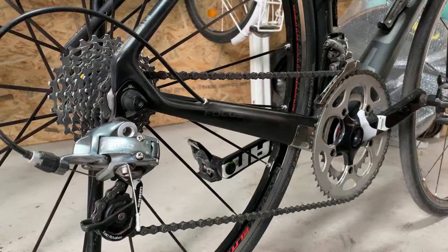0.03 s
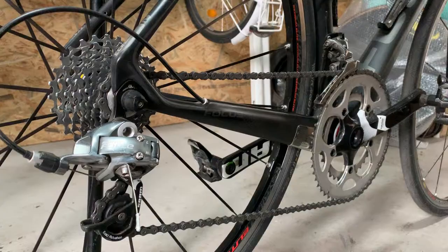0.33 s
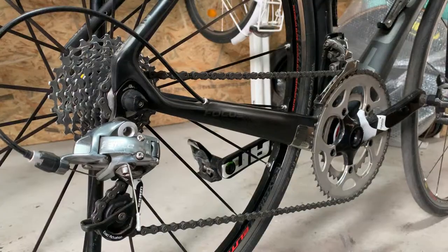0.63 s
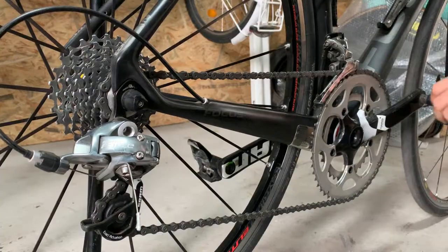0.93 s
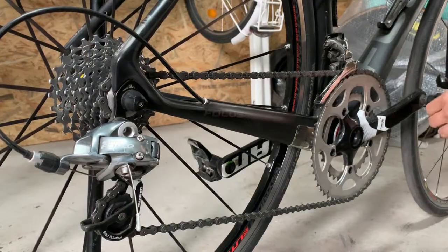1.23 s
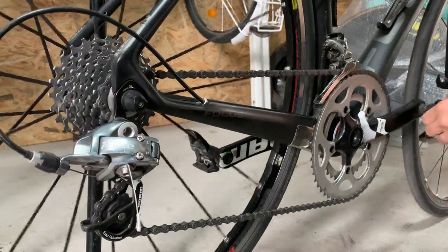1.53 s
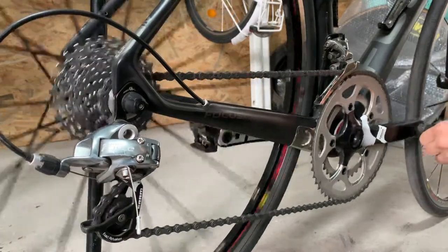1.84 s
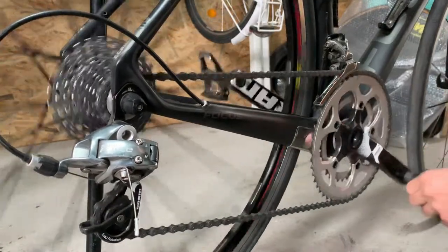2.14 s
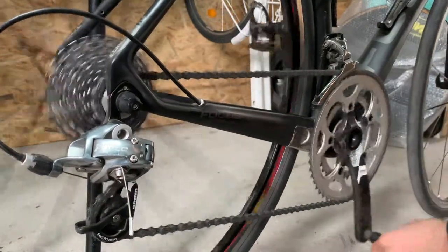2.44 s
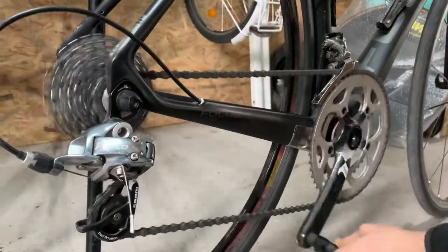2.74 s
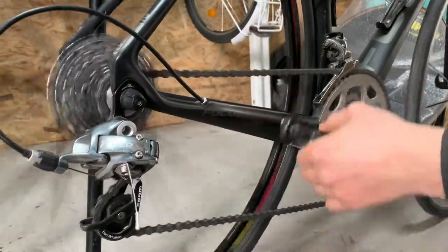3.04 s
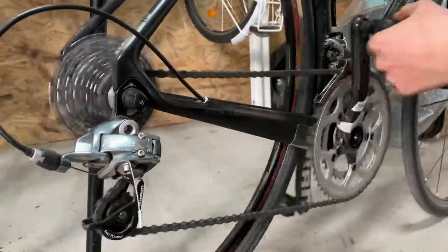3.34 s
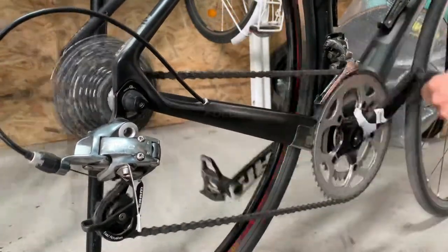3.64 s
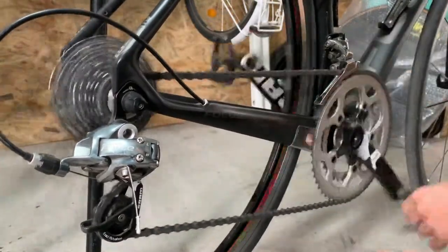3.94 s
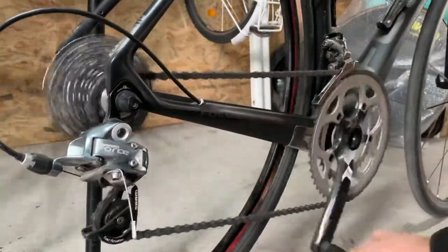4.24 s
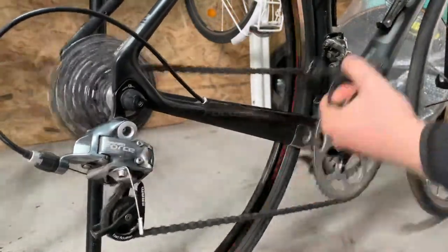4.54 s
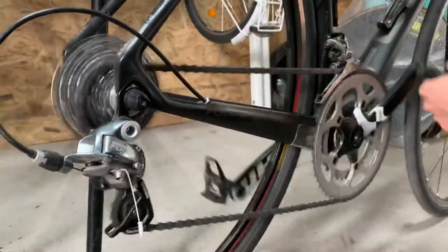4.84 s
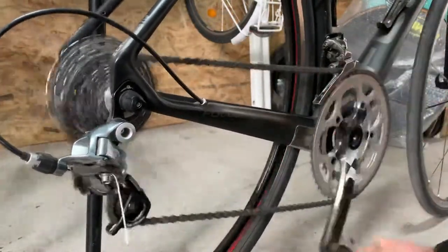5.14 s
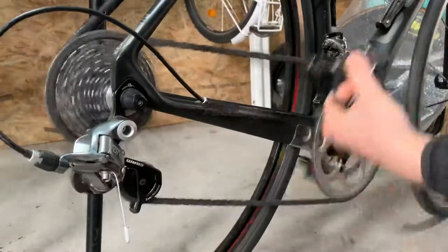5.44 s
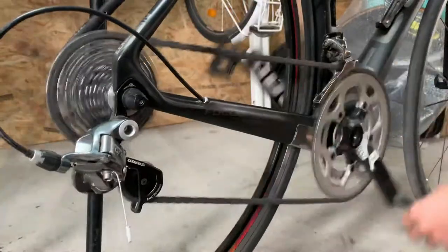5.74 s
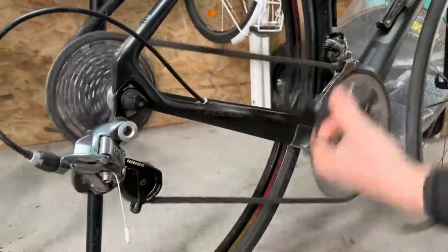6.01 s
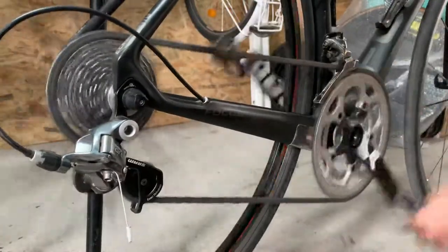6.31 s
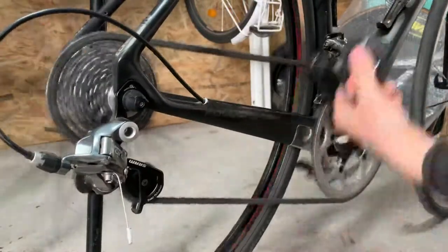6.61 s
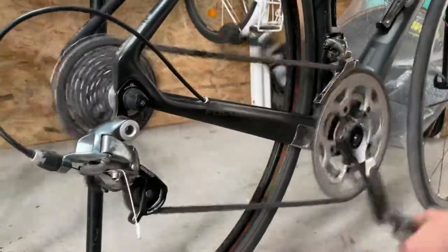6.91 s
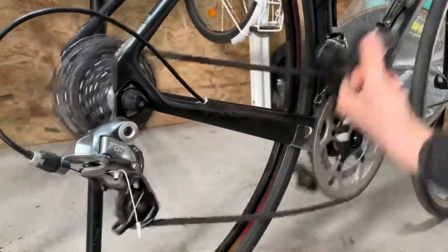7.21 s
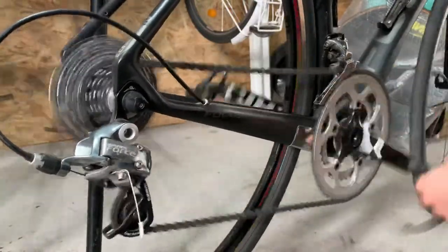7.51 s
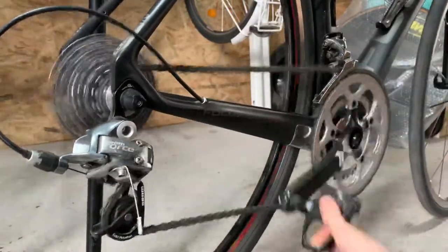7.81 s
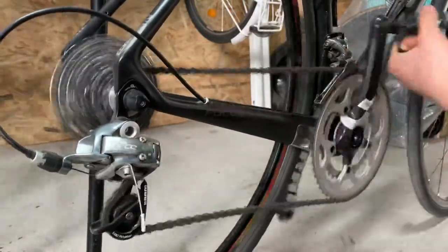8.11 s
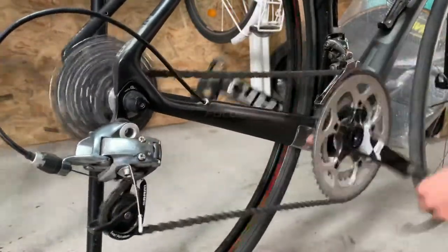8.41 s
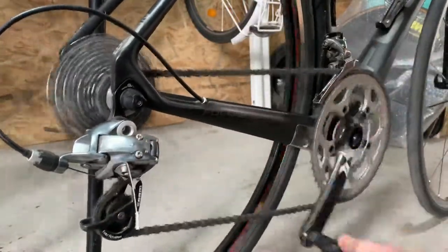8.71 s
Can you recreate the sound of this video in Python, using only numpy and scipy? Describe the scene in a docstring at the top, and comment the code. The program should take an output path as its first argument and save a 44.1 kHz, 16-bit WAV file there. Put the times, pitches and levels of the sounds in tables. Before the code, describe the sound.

Heard close up in stereo, a bicycle on a repair stand is cranked by hand. Soft cloth rustle and dull knocks give way to the quickening tick of chain links. Two flurries of gear changes follow, with a bright, clicking whirr between them: the chain scrapes across sprockets, lands with metallic clacks that ring the frame, and rattles as it settles. The small workshop adds short reflections and a faint low rumble.

```python
"""A sleeve brushes and a few dull knocks sound as a hand takes up the crank of a bicycle on a repair stand.
The chain gathers speed, each link ticking onto a tooth. The derailleur drags it up the cassette and back
down: it scrapes across the sprockets, drops onto each with a clack that rings cage, frame and wheel, and
rattles as it settles. We listen close up through a two-port microphone, in a small, live workshop."""
import sys
import numpy as np
from scipy import signal
from scipy.fft import rfft, irfft, next_fast_len
from scipy.io import wavfile

SR = 44100
rng = np.random.default_rng(int(sys.argv[2]) if len(sys.argv) > 2 else 0)


def generate_wav(signal):
    """Clip the signal to [-1, 1] and save it as 16-bit WAV at the path in sys.argv[1]."""
    frames = np.transpose(np.atleast_2d(signal))
    scaled = np.clip(frames, -1, 1) * 32767
    pcm = np.round(scaled).astype(np.int16)
    wavfile.write(sys.argv[1], SR, pcm)


N = 386316
T = np.arange(N) / SR
SIZE = next_fast_len(N + SR)
HZ = np.maximum(np.arange(SIZE // 2 + 1) * SR / SIZE, 1)

# chain speed: t/s, link rate/Hz
LINK_RATE = [(2.2, 41.18), (2.29, 41.74), (2.58, 51.1), (3.13, 60.83), (4.12, 74.06), (4.92, 71.1),
             (5.41, 72.1), (5.8, 94.6), (6.02, 83.33), (6.36, 98.06), (6.6, 86.36), (6.93, 95.4),
             (8.06, 78.4), (8.76, 78.5)]
# up the cassette and back: t/s, sprocket size (0 smallest, 1 largest)
SPROCKET_SIZE = [(4.12, 0.44), (4.75, 0.76), (5.3, 0.97), (5.6, 1), (6.2, 1), (6.6, 1), (7.25, 0.84),
                 (8.0, 0.59), (8.6, 0.27)]
# the chain drops onto a sprocket: t/s, snap/dB, thud/dB, cage ring/dB, cage f/Hz,
# sprocket clank/dB, clank f/Hz, cassette ping/dB, rattle/dB, contact/s
DROPS = [(4.1757, -26, -60, -58, 880, -40.5, 1374, -56, -35, 0.00067),
         (4.207, -29, -45, -42, 700, -57, 1210, -35, -43, 0.0023),
         (4.2695, -33, -36.5, -46, 853, -53, 1380, -37.5, -58, 0.002),
         (4.326, -23.5, -38.5, -33.5, 737, -32, 1170, -51, -61, .0011),
         (4.407, -46, -41.5, -33.5, 850, -38, 1700, -41, -43, 0.0012),
         (4.5002, -26.5, -36.5, -50, 600, -34, 1770, -38.5, -62, 0.0008),
         (4.508, -50, -37.5, -29, 662, -30.5, 1244, -54, -59, 0.0015),
         (4.662, -27.5, -41, -36.5, 760, -29, 1360, -36, -33, 0.0018),
         (4.711, -26.5, -52, -52, 803.5, -49, 1406, -52, -36, 0.00093),
         (4.831, -24, -35, -43, 643, -47, 1085, -53, -51, 0.0012),
         (4.8743, -20.5, -35, -29.5, 763, -32.5, 1140, -46, -56, 0.00077),
         (5.024, -20, -30, -30, 945, -30, 1378, -49, -30, 0.0038),
         (5.0841, -31, -53, -26.5, 845.5, -31, 1650, -45, -47, 0.00077),
         (5.1237, -24.5, -33.5, -39, 780, -39, 1379, -44, -31, .0057),
         (5.1862, -17, -36, -35, 875, -32, 1750, -37, -51, 0.00078),
         (5.3471, -16, -27.5, -27.5, 875, -24.5, 1430, -20.5, -69, 0.00097),
         (5.39, -30, -42, -29, 871, -45, 1430, -48, -35.5, 0.00084),
         (6.6372, -22, -35, -49, 1047, -35.5, 1226, -34, -34, 0.0015),
         (6.78, -22.5, -35, -49, 849, -30.5, 1360, -27, -27.5, 0.0027),
         (6.8264, -20.5, -43, -31, 842, -41, 1600, -34, -45, 0.0011),
         (6.8627, -24.5, -33, -30, 982, -25.5, 1350, -44, -27, 0.0024),
         (6.9697, -16.5, -32, -36, 907, -21.5, 1777, -45, -27.5, 0.0018),
         (7.07, -25, -33.5, -46, 1030, -48, 1220, -36, -31.5, 0.0019),
         (7.116, -15, -49, -48, 807, -25, 1790, -45, -45, 0.0012),
         (7.129, -36, -27, -26, 890, -32, 1376, -47, -35, .0014),
         (7.1922, -22.5, -38, -38, 826, -48, 1197, -34, -31.5, 0.0015),
         (7.2666, -18, -32, -24.5, 854, -23.5, 1598, -27, -36, .0012),
         (7.3422, -17.5, -38, -35, 818, -25.5, 1540, -33, -30.5, 0.00274),
         (7.3615, -18, -28.5, -49, 743, -42, 1422, -41, -44, 0.00085),
         (7.3975, -25, -31, -33, 1010, -38, 1210, -40, -34, 0.0015),
         (7.43, -27, -32, -31, 872, -26, 1978, -34, -49, 0.0027),
         (7.465, -25, -39, -52, 870, -33, 1200, -47, -55, .003),
         (7.5863, -38, -31.5, -21.5, 900, -21, 1122, -26.5, -29.5, 0.0025),
         (7.7241, -17.5, -29.5, -50, 840, -34, 1420, -36, -26, 0.0019),
         (7.7535, -20.5, -27.5, -35.5, 868, -26, 1625, -48, -35, 0.0012),
         (7.911, -26, -26, -32, 862, -31, 1320, -47, -31, 0.0018),
         (7.982, -28, -44, -32, 858, -30.5, 1185, -36, -32.5, 0.0025),
         (8.1294, -22.5, -29.5, -21, 872, -22.5, 1259, -43, -30, 0.0025),
         (8.3713, -19, -28.5, -16, 875.6, -17, 1360, -28, -31, 0.0019),
         (8.4719, -18, -31.5, -53, 908, -26.5, 1960, -39, -33.5, 0.0012),
         (8.6009, -23.5, -25, -17, 844, -19, 1740, -20, -39.5, 0.00079)]
# single links that seat hard: t/s, level/dB
HARD_LINKS = [(1.883, -76), (1.929, -60), (2.016, -53), (2.06, -58), (2.095, -51), (2.493, -47),
              (2.574, -49), (2.766, -44), (4.746, -20.5), (4.774, -24), (4.789, -28.5), (4.857, -30),
              (5.26, -32), (5.29, -46), (5.317, -50), (5.516, -33), (5.583, -49), (5.595, -26),
              (5.616, -25.5), (5.856, -28), (5.944, -29), (5.993, -27.5), (6.1139, -21.5), (6.18, -27.5),
              (6.344, -26.5), (6.4047, -24.5), (6.94, -24), (6.9562, -23.5), (6.994, -21), (7.141, -25),
              (7.354, -17), (7.41, -21), (7.58, -20.5), (7.7375, -17), (7.8473, -26), (7.8976, -16),
              (8.183, -24), (8.577, -17.5)]
# each jerk booms in a different part of frame, wheel or stand: t/s, level/dB, f/Hz
JERKS = [(1.44, -40, 315), (1.735, -44.5, 157.5), (2.114, -38, 72), (2.12, -45, 166), (2.23, -51, 160),
         (2.39, -49, 188), (3.47, -40, 113), (3.52, -45, 221), (3.57, -42.5, 361), (4.51, -37, 309),
         (4.755, -36.5, 172), (4.81, -34, 167), (4.88, -33, 186), (5.026, -36, 534), (5.352, -35, 306),
         (5.356, -29, 178), (7.129, -35, 464), (7.27, -30, 303), (7.587, -37, 658), (7.59, -31, 298),
         (7.735, -40, 154.9), (7.754, -38, 614), (7.912, -42, 282), (8.381, -28, 315),
         (8.478, -29.5, 163.7), (8.488, -31, 296), (8.59, -30, 183), (8.607, -30, 563), (8.625, -35, 78)]
# crank and freewheel: t/s, thud/dB, cage ring/dB, cage f/Hz, clank/dB, clank f/Hz, contact/s
CRANK_KNOCKS = [(0.368, -64, -58.5, 457, -82, 800, 0.0015), (1.110, -84, -72, 805, -63, 1110, 0.0022),
                (1.4335, -37.5, -36, 899, -35.5, 1110, 0.00074), (1.4425, -49, -46, 820, -41, 1030, .001),
                (1.4515, -46, -43, 940, -56, 1290, 0.00084), (1.7295, -42, -43, 824, -47, 1300, 0.00091),
                (2.114, -40.5, -41.5, 810, -40.5, 1280, 0.00097), (2.4, -69, -75, 800, -70, 1200, 0.0012),
                (3.118, -54, -53, 780, -66, 750, 0.0087), (3.145, -55, -53, 778, -62, 740, .01),
                (3.486, -48, -56, 700, -63, 780, 0.0078), (3.513, -41, -45, 750, -53, 720, 0.009),
                (3.543, -46, -43, 733, -53, 720, .01), (4.025, -43, -47, 800, -45.5, 1420, 0.0021),
                (4.066, -51, -52, 820, -62, 1100, 0.002)]
# the arm reaches for the pedal: peak t/s, half length/s, level/dB
SLEEVE_SWELLS = [(0.724, 0.21, -61.5), (1.13, 0.13, -61.5)]

# bodies with a set pitch: f/Hz, width/Hz, relative level/dB
FRAME_MODES = [(184, 42, 7), (302.8, 9.5, 16), (521, 240, 0.5), (541, 5.1, 7.5), (745.6, 8.9, 4),
               (812, 15, 8), (892, 20, -1), (990, 116, -19)]  # frame and wheel
CASSETTE_MODES = [(4280, 850, 5), (4740, 430, 13.5), (5730, 1200, 5)]
LARGE_SPROCKET_MODES = [(1750, 84, -3), (4830, 530, -2)]
# parts pitched anew by each strike: multiple of the pitch, width/Hz, relative level/dB
CAGE_MODES = [(.86, 110, -12), (0.921, 16.5, -4), (1.001, 95, 9)]  # derailleur cage
SPROCKET_MODES = [(.8, 220, -10.5), (1, 170, 3.5), (1.23, 220, 2.5), (1.5, 336, 0), (2.698, 500, -6.5)]
ROLLER_MODES = [(.65, 454, -6), (1, 330, 2), (1.63, 300, -5), (2.45, 350, 2), (3.1, 353.2, 6)]
BOOM_MODES = [(1, 16, -2), (1.23, 43, -10)]
# tone colour of each layer: f/Hz, relative level/dB
TICK_EQ = [(150, -45), (1200, -9), (2800, -10), (3900, -6), (4600, -25), (5500, 1), (6500, 6.5),
           (7500, -6.5), (10000, 4), (12500, 3.5), (15500, 5)]
ZING_EQ = [(2000, -45), (6500, -5.5), (7400, 4.5), (8400, 4.5), (9600, -4.5), (12500, -4), (15500, -11)]
SCRAPE_EQ = [(300, -18), (900, -3), (1700, -0.5), (2700, -2.5), (4500, -1.5), (6000, -9.5), (7800, 0),
             (11000, 3), (16000, -14)]
RUMBLE_EQ = [(20, -1), (45, -7), (85, 5.5), (120, 2), (170, 4), (240, -6.5), (400, -2.5), (800, -3.5),
             (1400, -10.5), (2500, -19.5), (6000, -48)]
SNAP_EQ = [(500, -10.5), (1500, -6), (3000, -10), (4700, 0), (6200, 2), (7800, 5.5), (10000, 1.5),
           (12500, 6.5), (15500, 4)]
THUD_EQ = [(60, -39), (150, 0), (400, -3.5), (560, -2.5), (900, 4.5), (1600, -3.5), (2600, -1.5),
           (5000, -15), (9000, -33), (16000, -56)]
KNOCK_EQ = [(60, -8), (150, -7.5), (400, 3), (780, 1), (1100, -4), (1600, -10), (2100, -14.5), (4500, -18),
            (6000, -33), (7600, -31), (16000, -36)]
CLOTH_EQ = [(200, 0), (550, 1), (900, 3), (1500, 2), (2600, -2), (4200, -6.5), (6000, -8), (8000, -10),
            (15000, -8.5)]
ROOM_TONE_EQ = [(18, -30), (25, -29), (34, 3), (48, -2), (100, -11), (160, -21.5), (255, -25.5), (640, -31),
                (1300, -34), (2500, -36.5), (4000, -38.5), (8000, -47.5), (11000, -56.5), (16000, -45)]
# workshop decay: f/Hz, T60/s
REVERB_T60 = [(150, 0.63), (400, 0.75), (800, 0.57), (1400, 0.65), (2800, 0.4), (4500, 0.78), (8000, 0.28),
              (15000, 1.6)]
# workshop reverb strength: f/Hz, level/dB
REVERB_EQ = [(100, -7.5), (300, 3), (800, -0.5), (2000, 0.5), (4500, 1.5), (8000, -7), (15000, -10.5)]
# tension pulses: multiple of the link rate, relative level/dB
HUM_PARTIALS = [(.5, -11), (1, 1), (2, -1)]
# the image leans left: f/Hz, left over right/dB
LEAN = [(150, 1.0), (350, 0.0), (750, 3.0), (1400, 3.0), (4000, 0.0)]

# chain faders: gain/dB cruising on the smallest sprocket, dB per doubling of speed, dB more on the largest
TICK_LAW, ROLLER_LAW, ZING_LAW = (-49, 15, 4.3), (-54.5, 0.85, 0.9), (-60.3, 3, 25.3)
SCRAPE_LAW, RUMBLE_LAW, HUM_LAW = (-58.5, 14.4, 16.2), (-68.5, 1, 25.2), (-69.5, 15, 16.6)
START_S, START_RAMP_S, CRUISE_HZ = 1.96, 0.41, 80  # the chain gets under way
UNSEAT_DB = -32  # rattle level at which links begin to miss their seats
SKEW_DB = -41  # on the largest sprockets the skewed chain clicks and clinks by itself
CLICK_CONTACT_S = .0008
THUD_LAG_S, THUD_SPREAD_S = 0.0018, 0.0022  # the heavy frame follows a blow late and slowly
PORT_LAG_S, ROOM_TONE_DB = 11.3 / SR, -55.5


def chain(frame, cassette):
    """The running chain ticks, zings, scrapes and hums, louder with speed and sprocket size."""
    rate, sprocket = curve(LINK_RATE), curve(SPROCKET_SIZE)
    phase = np.cumsum(rate) / SR  # links gone by
    moving = np.clip((T - START_S) / START_RAMP_S, 0, 1)
    tick_gain, roller_gain, zing_gain, scrape_gain, rumble_gain, hum_gain = (
        moving * undb(db + speed_db * np.log2(rate / CRUISE_HZ) + size_db * sprocket)
        for db, speed_db, size_db in (TICK_LAW, ROLLER_LAW, ZING_LAW, SCRAPE_LAW, RUMBLE_LAW, HUM_LAW))
    loose = rattle_envelope()
    unseated = np.hypot(1, loose / undb(UNSEAT_DB))  # a bouncing chain seats less firmly
    seating, rollers = links(phase, rate) / unseated
    ticks = through(seating * tick_gain, colour(TICK_EQ)) + rollers * roller_gain
    return (ticks + sprocket_zing(seating * zing_gain)
            + plate_scrape(np.hypot(scrape_gain, loose), cassette)
            + stray_links(np.hypot(loose, undb(SKEW_DB) * sprocket ** 6))
            + frame_rumble(phase, np.hypot(rumble_gain, undb(-11) * loose), frame)
            + tension_hum(phase) * hum_gain)


def links(phase, rate, scatter_db=3.2, limp_db=1.8, roller_hz=4700):
    """One tick and one roller ring per link; inner and outer links alternate strong and weak."""
    link = np.arange(int(phase[-1]) - 1)
    jitter, force, stretch, detune = rng.standard_normal((1024, 4))[:len(link)].T
    slowness = np.mean(rate) / np.interp(link, phase, rate)
    times = np.interp(link, phase, T) + .0007 * slowness * jitter
    sizes = unit(undb(scatter_db * np.clip(force, -2, 1.5) + limp_db * (-1) ** link))
    contacts = .0007 * slowness ** 1.2 * np.exp(.35 * stretch)  # a slow chain draws each tick out
    pitches = roller_hz * np.exp(.07 * detune)
    return bursts(times, sizes, contacts), rings(times + contacts, sizes, pitches, ROLLER_MODES, size=512)


def sprocket_zing(seating):
    """A skewed chain catches the teeth now harder, now softer, and the large sprockets ring."""
    grab = unit(undb(2.5 * walk(rate_hz=14)))
    return through(seating * grab, colour(ZING_EQ) + undb(-10) * resonances(LARGE_SPROCKET_MODES))


def plate_scrape(gain, cassette):
    """Side plates catch on the teeth in many small, uneven taps."""
    when, chance = rng.random((1500, 2)).T
    sizes = undb(-2.5 * np.log(np.maximum(chance, .02)))
    grit = unit(bursts(when * N / SR, sizes, contacts_s=.0014))
    return through(grit * gain, colour(SCRAPE_EQ) + undb(-13) * cassette)


def stray_links(gain, clink_hz=1400):
    """Bouncing links click on the teeth out of step and clink on the sprockets, each at its own pitch."""
    when, sizes = rng.random((500, 2)).T
    taps = unit(bursts(when * N / SR, sizes, CLICK_CONTACT_S))
    when, sizes, detune = rng.random((300, 3)).T
    pitches = clink_hz * np.exp(.25 * (2 * detune - 1))
    clinks = unit(rings(when * N / SR, sizes, pitches, SPROCKET_MODES))
    return through(taps * gain * undb(-4.5), colour(SNAP_EQ)) + clinks * gain * undb(-6)


def frame_rumble(phase, gain, frame):
    """Every link gives the frame a short, low shake."""
    shake = unit(np.exp(-(phase % 1) / 0.58) * rng.standard_normal(N))
    return through(shake * gain, colour(RUMBLE_EQ) + undb(-10) * frame)


def tension_hum(phase):
    """The chain rides a polygon of teeth, so its tension pulses once a link and once a link pair."""
    return sum(undb(db + 4 * walk(6)) * np.sin(2 * np.pi * order * phase) for order, db in HUM_PARTIALS)


def rattle_envelope(lead_s=0.0043, t60_s=0.73):
    """How loose the chain is: it rides up on the teeth just before each drop, bounces, then settles."""
    power = np.zeros(N)
    for s, *_, db, _ in DROPS:
        start = int((s - lead_s) * SR)
        age = T[:N - start]
        attack = np.minimum(age / lead_s / 2, 1)
        power[start:] += (attack * undb(db - 60 * age / t60_s)) ** 2
    return np.sqrt(power)


def shift_clacks(frame, cassette):
    """The chain drops onto a sprocket: the hit (snap, frame, cage) and its ring (cassette, sprocket)."""
    s, snap_db, thud_db, cage_db, cage_hz, clank_db, clank_hz, ping_db, _, contact = np.transpose(DROPS)
    snap = through(bursts(s, undb(snap_db), contact * 1.34), colour(SNAP_EQ))
    jolt = bursts(s + THUD_LAG_S, undb(thud_db), contact + THUD_SPREAD_S)
    thud = through(jolt, undb(0.5) * colour(THUD_EQ) + undb(-3.5) * frame)
    ping = through(bursts(s, undb(ping_db), contact * 2.5), cassette)
    cage = rings(s + contact, undb(cage_db), cage_hz, CAGE_MODES, size=6144)
    clank = rings(s + contact, undb(clank_db), clank_hz, SPROCKET_MODES)
    return snap + thud + cage, ping + clank


def link_clicks():
    """A link rides up on a tooth and snaps home; a large sprocket zings with it."""
    s, db = np.transpose(HARD_LINKS)
    seating = bursts(s, undb(db), CLICK_CONTACT_S)
    zing = through(seating * curve(SPROCKET_SIZE) ** 2, undb(-7.5) * colour(ZING_EQ))
    return through(seating, undb(-1.5) * colour(SNAP_EQ)) + zing


def booms():
    """Low resonances of the bicycle bloom and die after a jerk of the chain."""
    s, db, hz = np.transpose(JERKS)
    return rings(s, undb(db), hz, BOOM_MODES, rise_s=0.0065, size=8192)


def crank_knocks(frame):
    """Play in crank and freewheel is taken up: the frame thuds, the cage rings, a sprocket clanks."""
    s, thud_db, cage_db, cage_hz, clank_db, clank_hz, contact = np.transpose(CRANK_KNOCKS)
    jolt = bursts(s, undb(thud_db), contact + THUD_SPREAD_S)
    thud = through(jolt, undb(-1) * colour(KNOCK_EQ) + undb(-0.5) * frame)
    cage = rings(s + contact, undb(cage_db), cage_hz, CAGE_MODES, size=6144)
    clank = rings(s + contact, undb(clank_db), clank_hz, SPROCKET_MODES)
    return thud + cage + clank


def sleeve():
    """Cloth rubs on cloth in two soft, fluttering swells."""
    swell = sum(undb(db) * np.exp(-((T - s) / half) ** 2) for s, half, db in SLEEVE_SWELLS)
    friction = rng.standard_normal(N) * undb(1.2 * walk(rate_hz=30))
    return through(friction * swell, colour(CLOTH_EQ))


def workshop(x, predelay_s=.003):
    """Dense reflections from close walls, each octave dying at its own rate; a new tail on each call."""
    t, hz_axis = T[:SR], np.maximum(np.arange(SR // 2 + 1), 1)
    diffuse = two_ports(alike_hz=1030, size=SR)
    octaves_hz = 125 * 2. ** np.arange(8)
    onset = np.clip((t - predelay_s) / 0.000087, 0, 1)
    tail = 0
    for hz, share in zip(octaves_hz, np.eye(len(octaves_hz))):
        band = irfft(diffuse * np.interp(np.log(hz_axis), np.log(octaves_hz), share), SR)
        envelope = onset * undb(-60 * t / at_hz(REVERB_T60, hz))
        tail = tail + band * envelope / np.linalg.norm(envelope) * undb(at_hz(REVERB_EQ, hz))
    return through(x, rfft(tail, SIZE))


def moving_reflections(x, paths=3):
    """The contact point and the arm keep moving, so the sound drifts between paths round the room."""
    shares = np.array([walk(rate_hz=5) for _ in range(paths)])
    return sum(workshop(x * share) for share in shares / np.linalg.norm(shares, axis=0))


def room_tone():
    """A bed of low building rumble and faint hiss that lifts by 3 dB early on."""
    air = through(irfft(two_ports(alike_hz=855), SIZE), colour(ROOM_TONE_EQ))
    return unit(air) * undb(ROOM_TONE_DB + 0.26 * walk(1.37) + np.interp(T, [1.5, 2.6], [0, 3]))


def two_ports(alike_hz, size=SIZE):
    """Spectra of diffuse noise at both ports: alike in the bass, unrelated in the treble."""
    mid, side = rfft(rng.standard_normal((2, size)))
    hz = np.maximum(np.arange(len(mid)) * SR / size, 1)
    apart = 1 / (1 + (alike_hz / hz) ** 1.39)
    return (mid + np.sqrt(apart) * side * np.array([[1], [-1]])) / np.sqrt(1 + apart)


def bursts(times, sizes, contacts_s):
    """Each contact is a swelling, dying cluster of micro-impacts; its size is its rms over 10 ms."""
    out, grit = np.zeros(N + SR), rng.standard_normal(N + SR)
    for s, size, contact in np.broadcast(times, sizes, contacts_s):
        start, width = int(np.clip(s * SR, 0, N)), np.clip(contact * SR, 2, SR / 20)
        age = np.arange(int(10 * width)) / width
        cluster = age * np.exp(-age) * grit[start:start + len(age)]
        spectrum = rfft(cluster, 2 * next_fast_len(len(age)))
        burst = irfft(spectrum / np.abs(spectrum))[:len(age)] * np.exp(-age / 10)  # whitened
        out[start:start + len(age)] += size * burst * np.sqrt(.01 * SR / (burst @ burst))
    return out[:N]


def rings(times, sizes, pitches, modes, rise_s=.0007, size=1024):
    """Each strike rings the modes, slightly detuned, at its own pitch; strength is rms over 10 ms."""
    out, age = np.zeros(N + SR), T[:size]
    multiple, width, db = np.transpose(modes)[:, :, None]
    decays = undb(db) * np.exp(-np.pi * width * age) * (1 - np.exp(-age / rise_s))
    detunes = 1 + .02 * rng.standard_normal((1024, len(modes), 1))
    for s, strength, hz, detune in zip(times, sizes, pitches, detunes):
        ring = np.sum(decays * np.sin(2 * np.pi * hz * multiple * detune * age), axis=0)
        start = int(np.clip(s * SR, 0, N))
        out[start:start + size] += strength * ring * np.sqrt(.01 * SR / (ring @ ring))
    return out[:N]


def resonances(modes):
    """Unit-power response of a body with these modes."""
    return unit(sum((-1) ** k * undb(db) / (1 + 1j * (HZ ** 2 - hz ** 2) / (HZ * width))
                    for k, (hz, width, db) in enumerate(modes)))


def colour(points, size=4096):
    """Minimum-phase EQ of unit power with the given shape."""
    hz = np.maximum(np.arange(size // 2 + 1) * SR / size, 1)
    cepstrum = irfft(np.log(undb(at_hz(points, hz))), size)
    cepstrum[1:size // 2] *= 2
    cepstrum[size // 2 + 1:] = 0
    impulse = irfft(np.exp(rfft(cepstrum)))
    return unit(rfft(impulse, SIZE))


def walk(rate_hz):
    """Random drift of rms 1."""
    knots = rng.standard_normal(1024)
    return unit(np.interp(T * rate_hz, np.arange(len(knots)), knots))


def curve(table):
    """An automation lane, sample by sample."""
    return np.interp(T, *np.transpose(table))


def at_hz(points, hz):
    """Read (f/Hz, value) points on a log-frequency axis."""
    f, v = np.transpose(points)
    return np.interp(np.log(hz), np.log(f), v)


def through(x, response):
    return irfft(rfft(x, SIZE) * response, SIZE)[..., :N]


def undb(db):
    return 10 ** (np.asarray(db) / 20)


def unit(x):
    return x / np.sqrt(np.mean(np.abs(x) ** 2))


def scene():
    """The mix: the drivetrain's treble reaches the right port first, its long waves both alike."""
    frame, cassette = resonances(FRAME_MODES), resonances(CASSETTE_MODES)
    running, knocks, clicks, cloth = chain(frame, cassette), crank_knocks(frame), link_clicks(), sleeve()
    shifts, ringing = shift_clacks(frame, cassette)
    ringing = ringing + booms()
    bike = running + shifts + ringing + knocks + clicks
    send = (undb(-0.44) * running + undb(1.83) * shifts + undb(-1.5) * ringing
            + undb(0.5) * knocks + undb(1.5) * clicks + cloth)  # the sleeve is all reverb
    treble = 1 / (1 + (1700 / HZ) ** 6)
    left_lag = 1 - treble + treble * np.exp(-2j * np.pi * HZ * PORT_LAG_S)
    direct = np.array([through(bike, left_lag), bike])
    lean_db = at_hz(LEAN, HZ)
    balance = undb(np.array([lean_db, -lean_db]) / 2)
    return through(direct + moving_reflections(send), balance) + room_tone()


def record(dry, open_s=.118, top_hz=15900):
    """The sound opens after a moment of silence; a steep low-pass trims the top."""
    opened = np.clip((T - open_s) / .004, 0, 1)
    return signal.sosfilt(signal.ellip(10, .2, 70, top_hz, fs=SR, output="sos"), dry * opened)


dry = scene()
out = record(dry)
generate_wav(out)
```